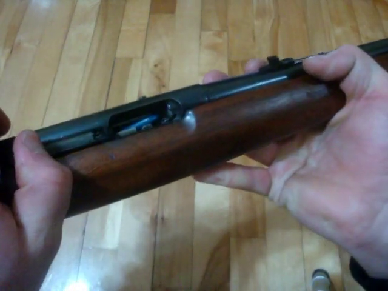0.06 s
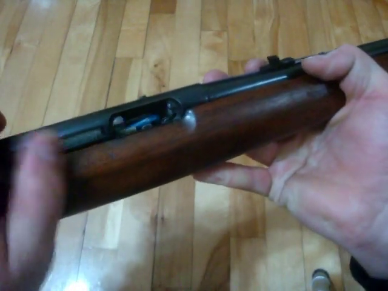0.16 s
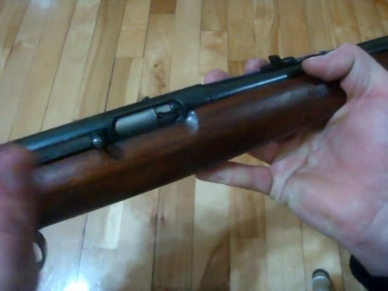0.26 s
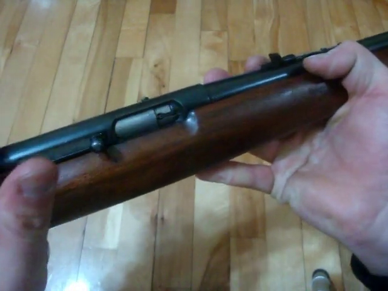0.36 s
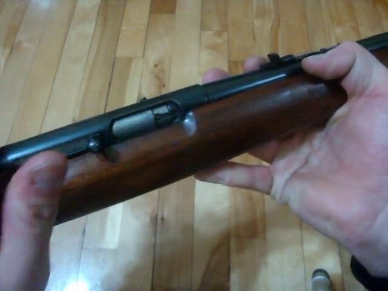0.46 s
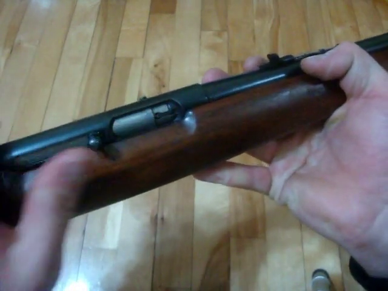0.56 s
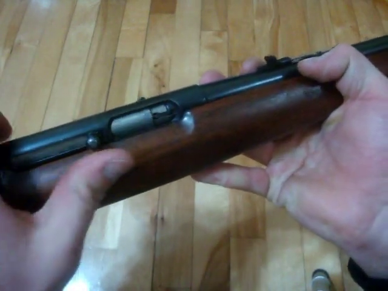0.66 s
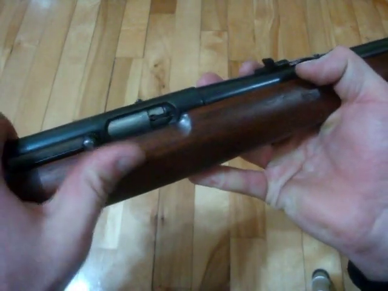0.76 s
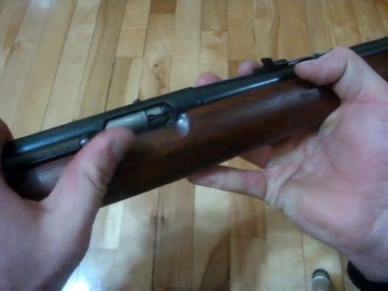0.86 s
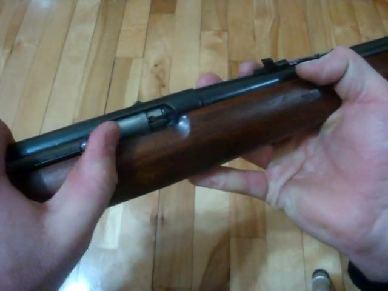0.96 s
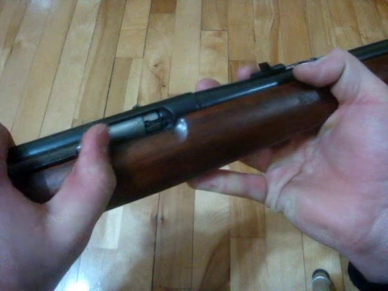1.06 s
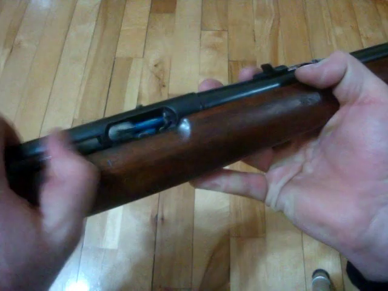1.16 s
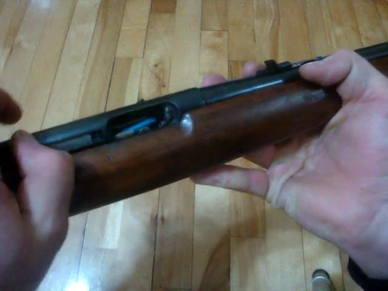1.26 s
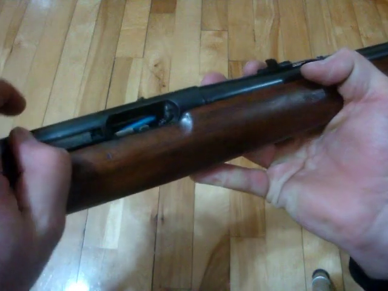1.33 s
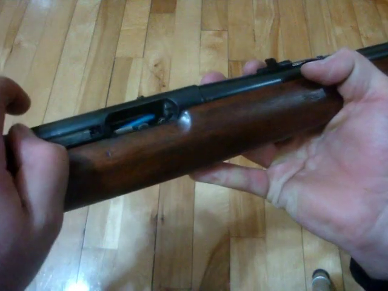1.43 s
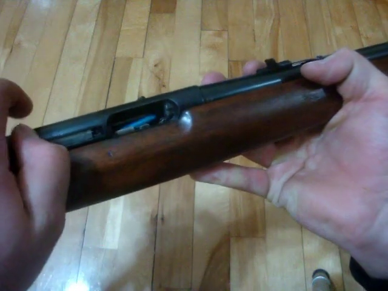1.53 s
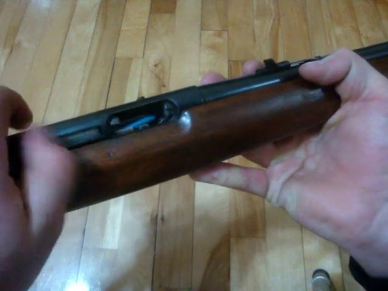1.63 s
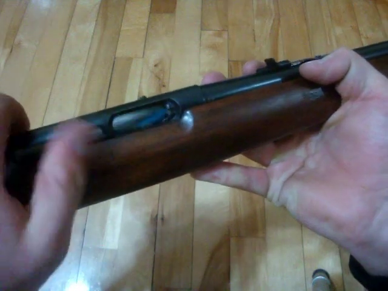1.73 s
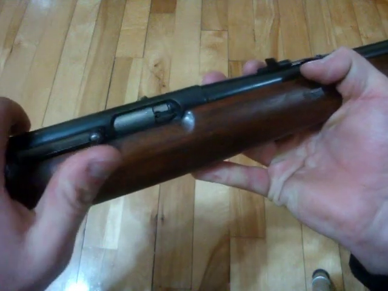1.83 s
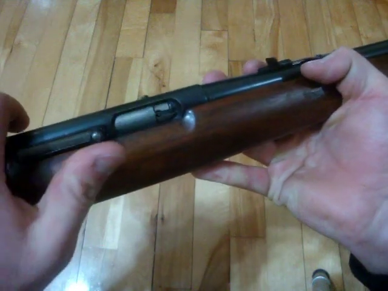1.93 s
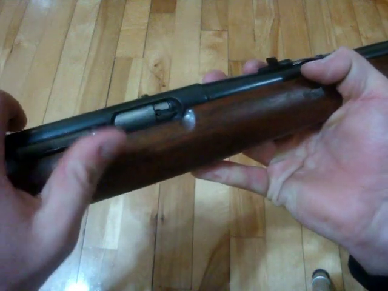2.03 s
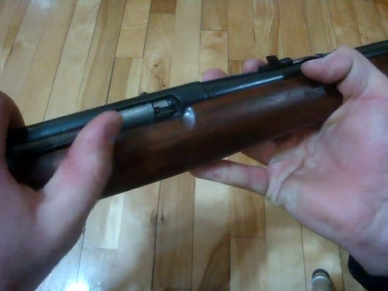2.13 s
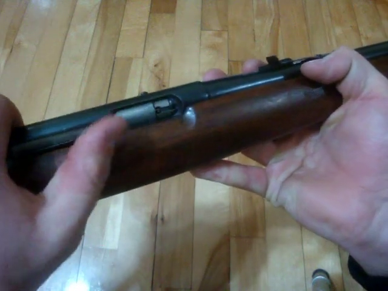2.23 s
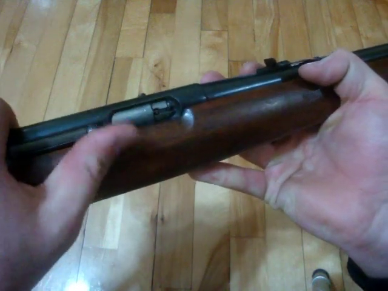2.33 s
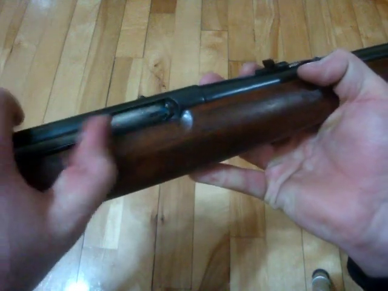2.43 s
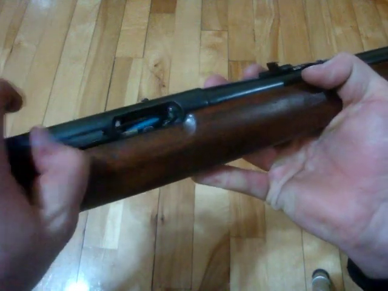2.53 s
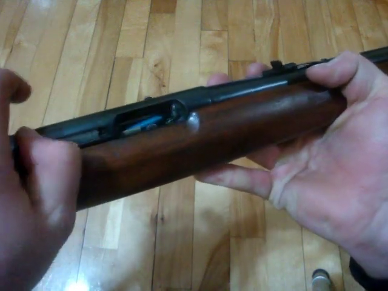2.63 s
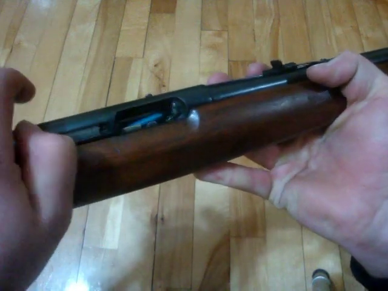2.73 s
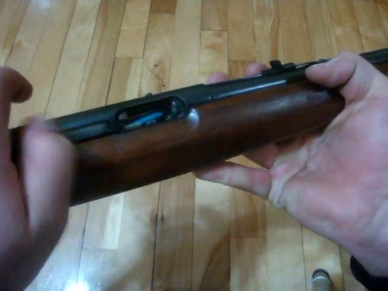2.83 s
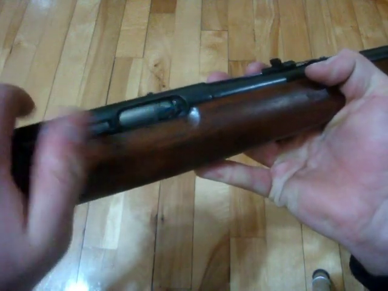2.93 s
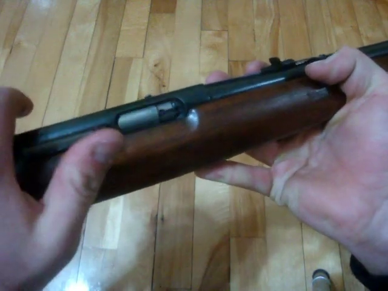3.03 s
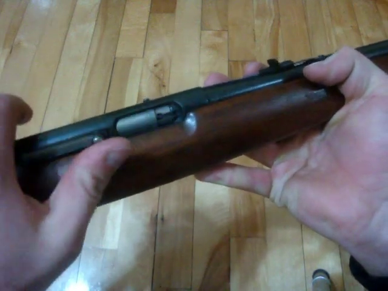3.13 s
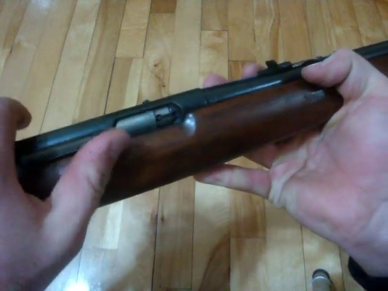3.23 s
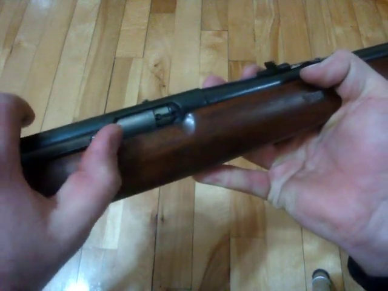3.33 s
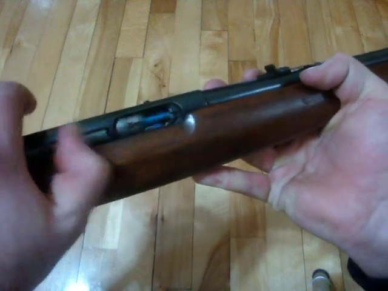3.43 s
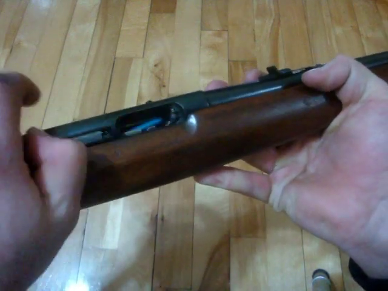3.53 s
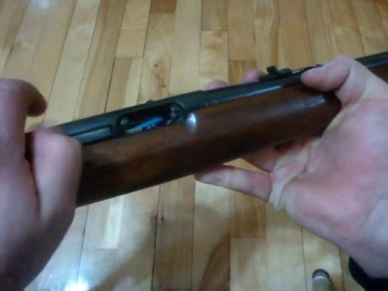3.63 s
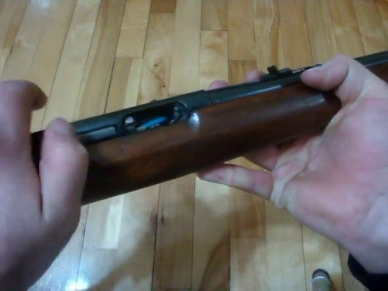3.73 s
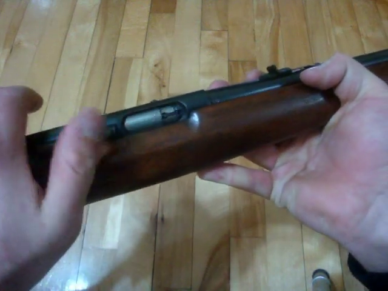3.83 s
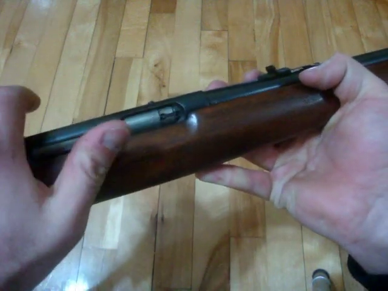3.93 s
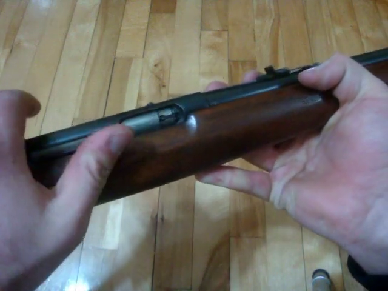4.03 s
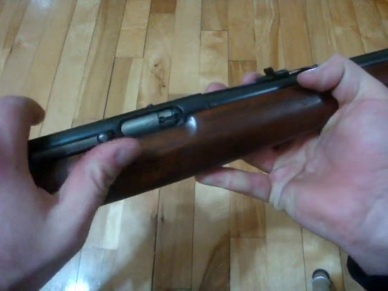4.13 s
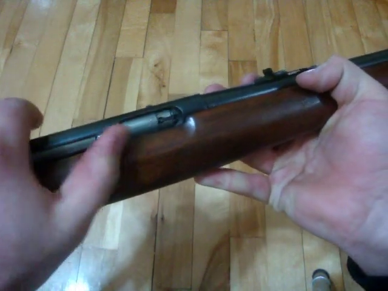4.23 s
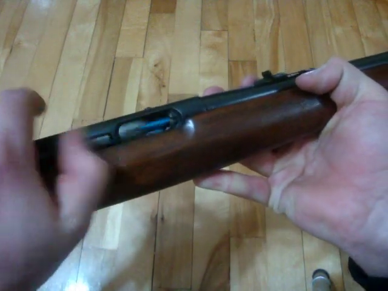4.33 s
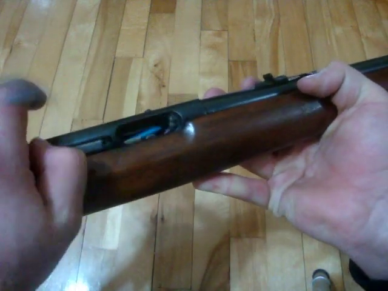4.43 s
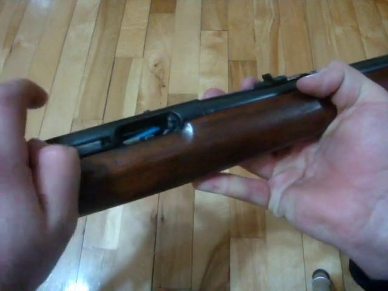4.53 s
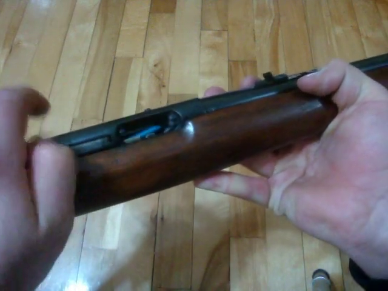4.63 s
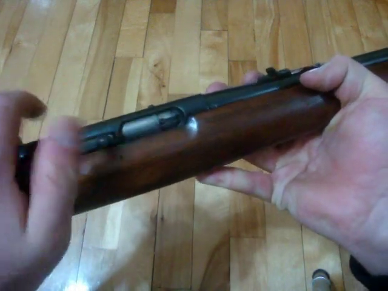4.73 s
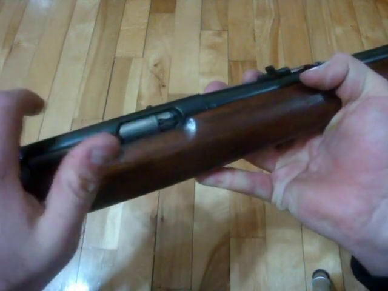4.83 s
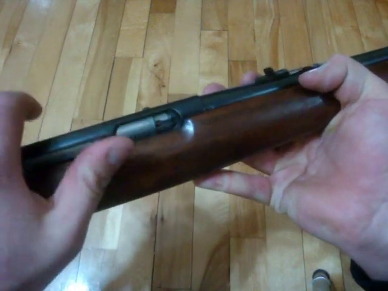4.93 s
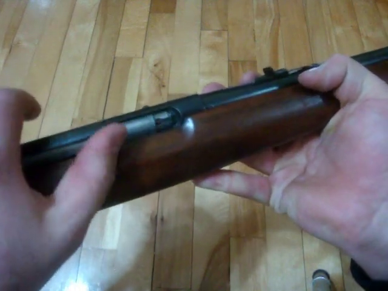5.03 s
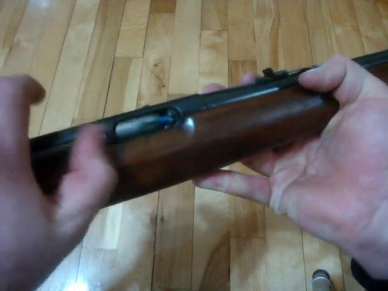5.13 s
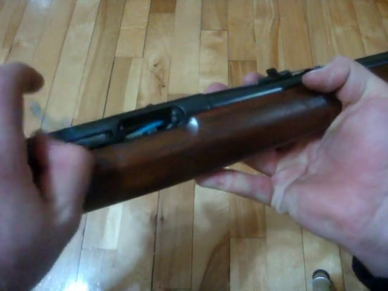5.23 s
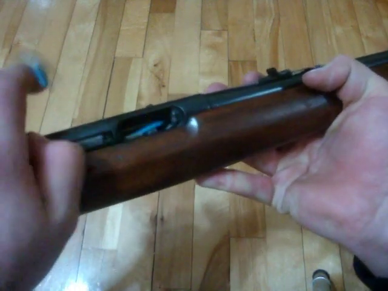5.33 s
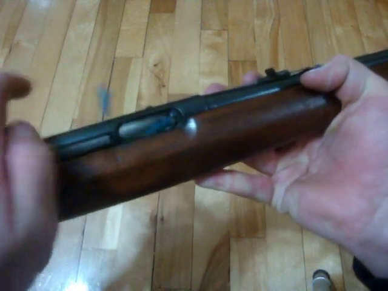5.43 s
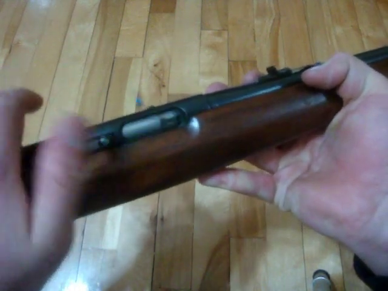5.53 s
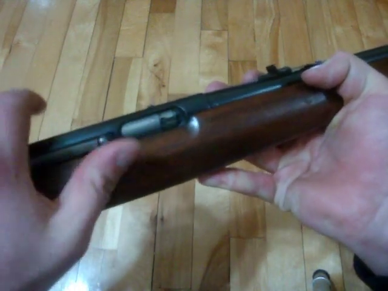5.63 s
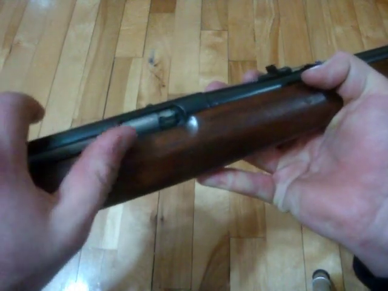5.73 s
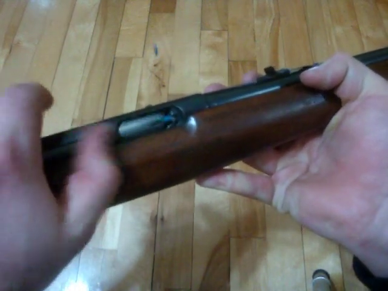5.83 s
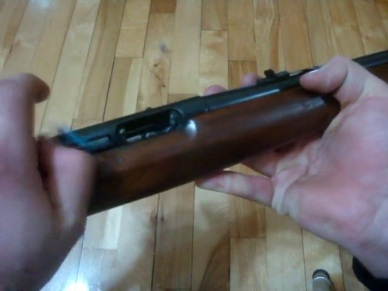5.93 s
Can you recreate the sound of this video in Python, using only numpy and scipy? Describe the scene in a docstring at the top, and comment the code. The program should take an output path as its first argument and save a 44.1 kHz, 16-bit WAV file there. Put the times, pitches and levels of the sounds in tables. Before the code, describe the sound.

Sharp metallic clacks and short scrapes repeat as someone cycles a rifle bolt at close range indoors. Each pull ends with a clack and the very faint ring of a spring, a dummy round snaps, and the bolt slams shut with a knock in the wooden stock. After the sixth closing, a round taps the floorboards. A hand rubs softly on the stock over low microphone hiss.

```python
"""A room with a wooden floor: close by, a rifle bolt is worked by hand, over and over.
Steel scrapes and clacks in the receiver; at each slam shut the stock knocks and the room answers.
Dummy rounds snap in and out, the compressed spring sings faintly, and one round lands on the floor.
Underneath, a hand rubs on the stock over steady microphone hiss."""
import sys
import numpy as np
from scipy import signal
from scipy.fft import rfft, irfft, next_fast_len
from scipy.io import wavfile
from scipy.ndimage import uniform_filter1d, map_coordinates

SR = 44100
rng = np.random.default_rng(int(sys.argv[2]) if len(sys.argv) > 2 else 0)


def output_pcm(signal):
    """Save a mono or channel-first signal as 16-bit PCM at the path in sys.argv[1].

    Samples are clipped to [-1, 1] before scaling.
    """
    pcm = np.clip(np.atleast_2d(signal).T, -1, 1) * 32767
    wavfile.write(sys.argv[1], SR, np.round(pcm).astype(np.int16))


N = 263718

# Table levels are relative. knock: wood of the stock; treble: shelf at 5 kHz; room: tail over blow.
# hand shifts on the stock: centre_s, swell_s, level_db
HAND_SHIFTS = [(0.09, 0.27, -55), (1.04, 0.12, -63), (2.33, 0.31, -62), (3.66, 0.18, -61.5),
               (4.58, 0.14, -65)]
# bolt eased along its rails: start_s, end_s, end_db, swell_db
BOLT_CREEPS = [(0.173, 0.201, -20, 28.5), (1.088, 1.147, -42.5, 17), (2.1, 2.514, -48.5, 2),
               (2.844, 2.938, -41, 1.5), (3.319, 3.42, -51.5, -12), (3.571, 3.766, -48, 1.5),
               (4.445, 4.725, -46, 0), (5.328, 5.417, -42.5, 3.5), (5.825, 5.939, -44, 2.5)]
# handle and lifter meet their stops: time_s, level_db, treble_db, room_db
STOP_CLACKS = [(0.195, -7, 4, -11), (1.667, -9.5, -2.5, -19), (1.701, -11.5, 1, -0.5),
               (2.321, -26, -3, -11), (2.381, -25, 6, 0), (3.376, -24, 9, -22), (3.408, -17.5, 5, -12),
               (3.775, -22, -1.5, -11), (4.318, -16, 11, -6.5), (4.717, -17.5, 9, -4), (4.82, -16, -8, -3),
               (4.89, -19.5, 18, -3), (5.117, -18.5, -1, -20), (5.205, -17.5, 8, 3.5),
               (5.854, -20.5, 8, -10), (5.881, -17.5, 8, -22), (5.904, -11, 0, -7.5), (5.92, -13, 2, -12)]
# bolt runs home: time_s, level_db, knock_db, treble_db, round_lead_s, rebound_s, scrape_s
BOLT_SLAMS = [(0.246, -3, 0, 3, 0.011, .019, 0.038), (1.769, -5, 0, -2.5, .011, 0.02, 0.018),
              (2.958, -4.5, 1, -3.5, .013, 0.017, 0.024), (3.836, -5.5, -1, 0, .013, .018, 0.028),
              (4.749, -6.5, 4.5, -3, .014, .015, 0.021), (5.467, -6.5, -1, -2.5, .011, 0.017, 0.026)]
# round met, breech struck, bolt seated, rebound: offset_db, knock_db, treble_db, room_db
SLAM_BLOWS = [(-4.5, 0, 6.5, 0), (-1, 4.5, 6.5, -1), (-4.5, -4, 9.5, 1), (-2, 0, 8.5, 1.5)]
# round snaps against lifter or port: time_s, level_db, treble_db
ROUND_SNAPS = [(1.073, -25.5, -2.5), (1.278, -11, -5), (2.441, -23.5, -5), (2.464, -14, 11.5),
               (2.593, -21.5, -9.5), (2.871, -13, 1), (3.672, -13.5, -4.5), (4.441, -15, -4),
               (4.675, -10.5, 2), (5.272, -10.5, -3.5), (5.424, -10, -0.5)]
# thumb takes up the bolt's play: time_s, level_db, treble_db
BOLT_TAKE_UPS = [(1.118, -16.5, 9), (1.619, -9, -4), (2.043, -22.5, 5), (3.322, -17, 2.5),
                 (4.198, -12.5, 4.5), (5.081, -16, 0.5)]
# two contacts of a take-up: offset_db, knock_db, treble_db, room_db
TAKE_UP_BLOWS = [(0.5, 5, -1.5, -2.5), (-5.5, 2, -1, -4.5)]
# bolt drawn back: free_s, rear_s, free_db, rear_db, scrape_db
BOLT_PULLS = [(1.162, 1.215, -8.5, -11, -26), (2.494, 2.538, -8, -11.5, -24), (3.445, 3.492, -10, -11, -24),
              (4.349, 4.385, -9.5, -9.5, -25), (5.154, 5.22, -10, -12.5, -30.5)]
# ejected round hits the floor: time_s, level_db, knock_db, treble_db, room_db
ROUND_DROPS = [(5.637, -13.5, -26, -2.5, -5.5), (5.654, -20.5, 9, -7, -3.5)]

# skin on wood: freq_hz, gain_db
PALM_SPECTRUM = [(30, -15), (130, -5.5), (300, -0.5), (700, 2.5), (1500, -0.5), (4000, -9.5), (10000, -48)]
# microphone hiss: freq_hz, gain_db
HISS_SPECTRUM = [(25, -11), (100, -24), (300, -10), (800, 2), (2000, 3), (5500, 5), (8000, 4.5), (9900, 4),
                 (10150, -8), (11100, -10.5), (11500, -26)]
# steel receiver: freq_hz, gain_db
RECEIVER_SPECTRUM = [(300, -21.5), (700, -15.5), (970, -0.5), (1250, -2), (1800, 0.5), (2800, 5),
                     (3500, 2.5), (5200, -1), (6400, -0.5), (7600, -6), (9600, -8), (10200, -16.5),
                     (11200, -25.5), (12200, -46)]
# wooden stock: freq_hz, gain_db
STOCK_SPECTRUM = [(20, -7), (55, -2.5), (140, -5.5), (260, -2.5), (500, -4), (800, -6.5), (1600, -33.5)]
# floorboard: freq_hz, gain_db
FLOOR_SPECTRUM = [(150, -26), (450, -5.5), (900, -1.5), (1500, -5), (3200, -2.5), (4200, 4), (4900, 7.5),
                  (6000, -1.5), (9200, -6), (12000, -29)]
# room tail of a bolt blow: freq_hz, gain_db
BOLT_TAIL_SPECTRUM = [(60, -24.5), (300, -17), (600, -10.5), (950, -3.5), (1300, -2), (2500, 1.5),
                      (4100, 3.5), (5300, 2), (6300, -5), (9500, -6.5), (10200, -21), (11200, -20.5),
                      (12000, -44)]
# room tail of a snapping round: freq_hz, gain_db
SNAP_TAIL_SPECTRUM = [(400, -19), (1000, 1), (2400, 3), (3400, 8), (5200, -21)]
# modes of the steel action: pitch_hz, level_db, t60_s
ACTION_MODES = [(994, -8.5, 0.033), (1765, 2.5, 0.02), (2200, 3.5, 0.0082), (2770, 6, 0.018),
                (3230, -3, 0.012), (3830, 1.5, 0.023), (4850, -5, 0.022), (5160, 5, 0.01),
                (6740, 7, 0.0086), (7570, 1, 0.014), (8470, 3.5, 0.012)]
# room decay: freq_hz, t60_s
ROOM_DECAY = [(100, 0.75), (500, 0.4), (1500, .43), (3000, 0.41), (5500, 0.4), (10000, 0.32)]


def amp(db):
    """Decibels to gain."""
    return 10 ** (np.asarray(db) / 20)


def unit(x):
    """Scale to rms 1."""
    return x / np.sqrt(np.mean(x ** 2) + 1e-20)


def along(points, hz):
    """Read (freq_hz, value) points on a log axis."""
    points_hz, values = np.transpose(points)
    return np.interp(np.log(hz + 1), np.log(points_hz), values)


def add(track, start_s, x):
    """Mix x into the track."""
    part = track[max(round(start_s * SR), 0):][:len(x)]
    part += x[:len(part)]


def coloured(x, curve_db):
    """Minimum-phase filter with gain curve_db(hz)."""
    size = 2 * next_fast_len(len(x) // 2 + 512)
    cepstrum = irfft(np.log(amp(curve_db(np.fft.rfftfreq(size, 1 / SR)))))
    cepstrum[1:size // 2] *= 2
    cepstrum[size // 2 + 1:] = 0
    return irfft(rfft(x, size) * np.exp(rfft(cepstrum)))[:len(x)]


def shaped(x, spectrum):
    """Filter by (freq_hz, gain_db) points."""
    return coloured(x, lambda hz: along(spectrum, hz))


def noise(spectrum):
    """Steady noise of rms 1."""
    return unit(shaped(rng.standard_normal(N), spectrum))


def wobble(rate_hz, size):
    """Smooth random curve between -1 and 1."""
    knots = rng.standard_normal(size // 4)
    return np.tanh(map_coordinates(knots, [np.arange(size) * rate_hz / SR], mode="wrap"))


def hiss(level_db=-60):
    """Steady microphone noise."""
    return amp(level_db) * noise(HISS_SPECTRUM)


def hand_rub(rest_db=-68.5):
    """Skin rubs on wood, swelling with each shift of grip."""
    t = np.arange(N) / SR
    shifts = sum(amp(db) * np.exp(-((t - s) / swell_s) ** 2) for s, swell_s, db in HAND_SHIFTS)
    return (amp(rest_db) + shifts) * noise(PALM_SPECTRUM)


def wandering(x, depth_db):
    """The contact point travels, so the resonances it feeds swell and fade."""
    bins = signal.stft(x, nperseg=256)[2]
    field = uniform_filter1d(rng.standard_normal(bins.shape), size=3, axis=0)
    field = uniform_filter1d(field, size=6, axis=1)
    return signal.istft(bins * amp(depth_db * np.tanh(unit(field))), nperseg=256)[1][:N]


def room_tail(build_s=0.0094):
    """Diffuse tail of energy 1: builds as the walls reply; treble dies first."""
    hz, t, bins = signal.stft(rng.standard_normal(SR // 2), SR, nperseg=256)
    decay = amp(-60 * t / along(ROOM_DECAY, hz)[:, None])
    build = 1 - np.exp(-(t / build_s) ** 2)
    tail = signal.istft(bins * decay * build, SR, nperseg=256)[1]
    return tail / np.linalg.norm(tail)


def bolt_scrape(catch_hz=420, pull_swell_db=11.5, slam_swell_db=13.5):
    """Sliding steel catches and slips; pulls and slams swell and run just past the stop."""
    pulls = [(free_s, rear_s + .012, db, pull_swell_db) for free_s, rear_s, _, _, db in BOLT_PULLS]
    slams = [(s - scrape_s, s + .0098, db - 14, slam_swell_db) for s, db, *_, scrape_s in BOLT_SLAMS]
    pressure = np.zeros(N)
    for start_s, end_s, end_db, swell_db in pulls + slams + list(BOLT_CREEPS):
        size = max(round((end_s - start_s) * SR), 2)
        swell = amp(np.linspace(end_db - swell_db, end_db, size))
        add(pressure, start_s, swell * signal.windows.tukey(size, .25))
    friction = amp(8 * wobble(catch_hz, N)) * rng.standard_normal(N)
    rubbed = wandering(shaped(friction, RECEIVER_SPECTRUM), depth_db=5)
    scrape = amp(-.5) * pressure * unit(rubbed)
    return scrape + amp(-13.5) * signal.fftconvolve(scrape, room_tail())[:N]


def contact(t, t60_s, rise_s, scuff_db, chatter_db=6):
    """Force of a blow at t = 0: the faces scuff, strike and chatter."""
    after_s = np.maximum(t, 0)
    strike = (1 - np.exp(-(after_s / rise_s) ** 2)) * amp(-60 * after_s / t60_s)
    scuff = amp(scuff_db - 60 * abs(t) / 0.0061)
    chatter = amp(chatter_db * wobble(1504, len(t)))
    return rng.standard_normal(len(t)) * chatter * np.hypot(strike, scuff)


def action_ring(t, rise_s=0.00094):
    """Struck modes; strength and pitch scatter as the grip of the action changes."""
    t = np.maximum(t, 0)
    hz, db, t60_s = np.transpose(ACTION_MODES)[:, :, None]
    strength, detune, phase = rng.standard_normal((3, len(ACTION_MODES), 1))
    hz, db = hz * (1 + .008 * detune), db + 2.5 * strength
    partials = amp(db - 60 * t / t60_s) * np.sin(2 * np.pi * (hz * t + phase))
    return np.sum(partials, 0) * (1 - np.exp(-t / rise_s))


def steel(t, t60_s, rise_s, scuff_db, ring_db, crack_db):
    """Steel on steel: bright crack, receiver chatter, ringing action."""
    edge = np.diff(contact(t, t60_s=0.0014, rise_s=.0001, scuff_db=-63), prepend=0)
    crack = unit(shaped(edge, RECEIVER_SPECTRUM))
    chatter = unit(shaped(contact(t, t60_s, rise_s, scuff_db), RECEIVER_SPECTRUM))
    return chatter + amp(crack_db) * crack + amp(ring_db) * unit(action_ring(t))


def blows(rows, voice, tail_spectrum, gain_db, stock_db, tail_treble_db, scuff_lead_s=.012):
    """Each blow sounds its voice, knocks on wood and excites the room."""
    track = np.zeros(N)
    t = np.arange(SR // 16) / SR - scuff_lead_s
    shelf = lambda hz: 1 / (1 + (5000 / (hz + 1)) ** 4) - .5
    for time_s, level_db, knock_db, treble_db, room_db in rows:
        direct = coloured(unit(voice(t)), lambda hz: treble_db * shelf(hz))
        wood = unit(shaped(contact(t, t60_s=0.019, rise_s=0.00023, scuff_db=-12.5), STOCK_SPECTRUM))
        hit = amp(level_db + gain_db) * (direct + amp(knock_db + stock_db) * wood)
        # the room hears every side of the source, so its colour varies less
        tilt_db = tail_treble_db + .5 * treble_db
        tail = coloured(room_tail(), lambda hz: along(tail_spectrum, hz) + tilt_db * shelf(hz))
        add(track, time_s - scuff_lead_s, hit)
        add(track, time_s, amp(room_db) * np.linalg.norm(hit) * tail / np.linalg.norm(tail))
    return track


def volley(times_s, level_db, knock_db, treble_db, contacts):
    """Blow rows of one gesture, offset by its strength, weight and brightness."""
    offsets_db = (level_db, knock_db, treble_db, 0)
    return [(s, *np.add(own_db, offsets_db)) for s, own_db in zip(times_s, contacts)]


def light_blows(rows):
    """Light steel contacts: slower rise and longer chatter than a slam."""
    clack = lambda t: steel(t, t60_s=0.021, rise_s=0.0027, scuff_db=-9.5, ring_db=-10.5, crack_db=-9.5)
    return blows(rows, clack, BOLT_TAIL_SPECTRUM, gain_db=-22.5, stock_db=-29, tail_treble_db=-11.5)


def burr_ticks(rate_hz=11, offset_db=19.5, spread_db=2, knock_db=3.3, treble_db=-3.3):
    """The creeping bolt ticks over burrs at uneven steps."""
    rows, steps = [], np.arange(12)
    for start_s, end_s, end_db, swell_db in BOLT_CREEPS:
        times_s = start_s + (steps + rng.random(len(steps))) / rate_hz
        levels_db = end_db - swell_db / 2 + offset_db + spread_db * rng.standard_normal(len(steps))
        rows += [(s, db, knock_db, treble_db, 0) for s, db in zip(times_s, levels_db) if s < end_s]
    return light_blows(rows)


def stop_clacks(knock_db=3):
    """Handle and lifter strike their stops."""
    rows = [(s, db, knock_db, treble_db, room_db) for s, db, treble_db, room_db in STOP_CLACKS]
    return light_blows(rows)


def bolt_slams(seat_s=.0045):
    """Four hard contacts: the bolt meets the round, strikes the breech, seats, rebounds."""
    slam = lambda t: steel(t, t60_s=0.0084, rise_s=0.0015, scuff_db=-6.5, ring_db=-12, crack_db=-4)
    rows = []
    for s, db, knock_db, treble_db, round_lead_s, rebound_s, _ in BOLT_SLAMS:
        times_s = [s - round_lead_s, s, s + seat_s, s + rebound_s]
        rows += volley(times_s, db, knock_db, treble_db, SLAM_BLOWS)
    return blows(rows, slam, BOLT_TAIL_SPECTRUM, gain_db=-23.5, stock_db=-22.5, tail_treble_db=5.5)


def round_snaps(case_hz=3270, case_db=8, knock_db=4, room_db=-15):
    """A held round rings the action briefly; its hollow case adds a ping."""
    ping = lambda hz: case_db / (1 + ((hz / case_hz - 1) * 20) ** 2)
    strike = lambda t: steel(t, t60_s=0.011, rise_s=0.0022, scuff_db=-7.5, ring_db=-1, crack_db=-4)
    snap = lambda t: coloured(strike(t), ping)
    rows = [(s, db, knock_db, treble_db, room_db) for s, db, treble_db in ROUND_SNAPS]
    return blows(rows, snap, SNAP_TAIL_SPECTRUM, gain_db=-20, stock_db=-33, tail_treble_db=-16.5)


def bolt_take_ups(gap_s=.010):
    """The thumb takes up the bolt's play: a double clack."""
    rows = []
    for s, db, treble_db in BOLT_TAKE_UPS:
        rows += volley([s, s + gap_s], db, 0, treble_db, TAKE_UP_BLOWS)
    return light_blows(rows)


def bolt_pulls():
    """The bolt clacks on breaking free and at the rear stop."""
    rows = []
    for free_s, rear_s, free_db, rear_db, _ in BOLT_PULLS:
        # time_s, level_db, knock_db, treble_db, room_db
        rows += [(free_s, free_db, 4.3, 7, -10.5), (rear_s, rear_db, 5, 1, -11)]
    return light_blows(rows)


def spring(pitch_hz=1141, t60_s=1.06, level_db=-51.5):
    """At each rear stop the compressed spring rings one faint, pure note."""
    track, t = np.zeros(N), np.arange(SR) / SR
    for _, rear_s, *_ in BOLT_PULLS:
        add(track, rear_s, amp(level_db - 60 * t / t60_s) * np.sin(2 * np.pi * pitch_hz * t))
    return track


def round_drop():
    """An ejected round knocks on the floorboards."""
    drop = lambda t: shaped(contact(t, t60_s=0.042, rise_s=0.00078, scuff_db=-28), FLOOR_SPECTRUM)
    return blows(ROUND_DROPS, drop, FLOOR_SPECTRUM, gain_db=-21, stock_db=-30, tail_treble_db=-3.5)


def scene():
    """Mono mix on both channels."""
    mono = hiss() + hand_rub() + bolt_scrape() + burr_ticks() + stop_clacks() + bolt_slams()
    mono += round_snaps() + bolt_take_ups() + bolt_pulls() + spring() + round_drop()
    return np.array([mono, mono])


def record(dry, cutoff_hz=12400):
    """Steep low-pass band limit."""
    size = next_fast_len(N + SR // 2)
    hz = np.fft.rfftfreq(size, 1 / SR)
    return irfft(rfft(dry, size) / (1 + (hz / cutoff_hz) ** 60), size)[:, :N]


dry = scene()
out = record(dry)
output_pcm(out)
```